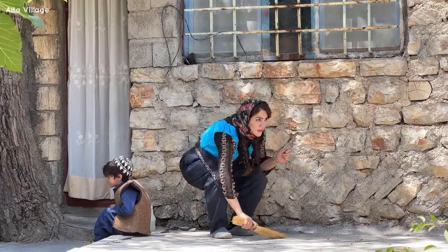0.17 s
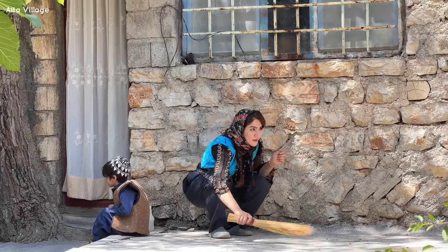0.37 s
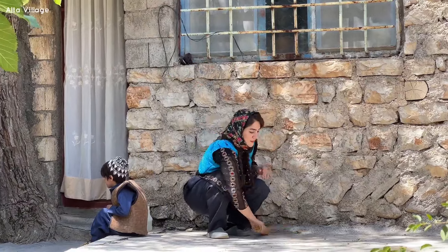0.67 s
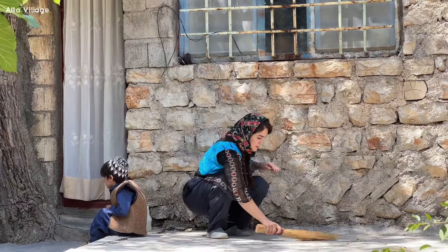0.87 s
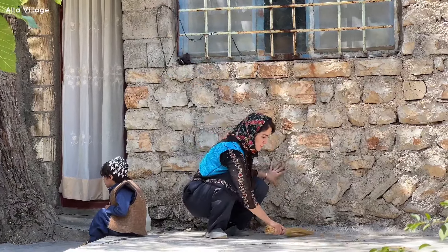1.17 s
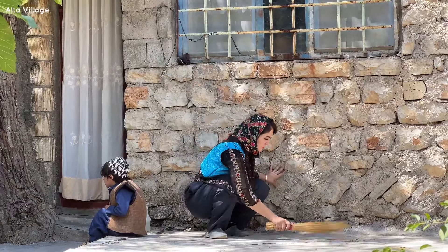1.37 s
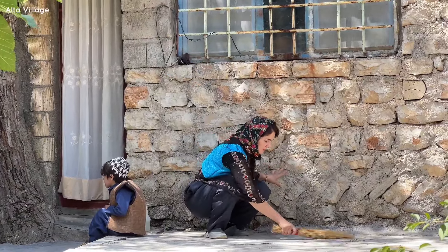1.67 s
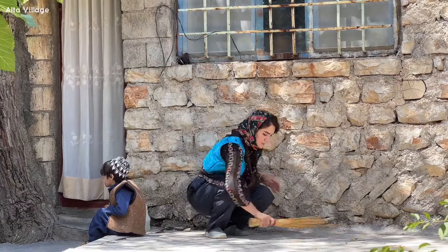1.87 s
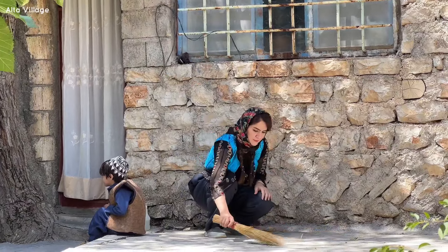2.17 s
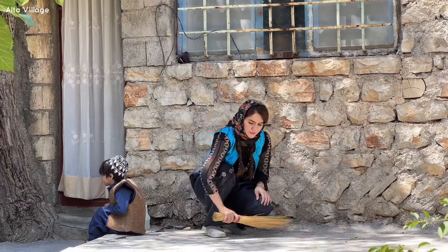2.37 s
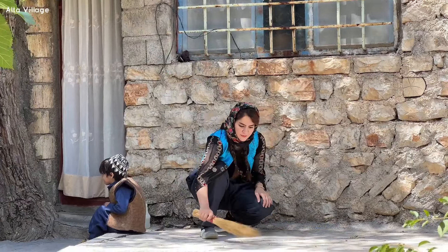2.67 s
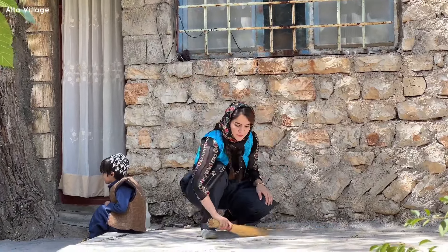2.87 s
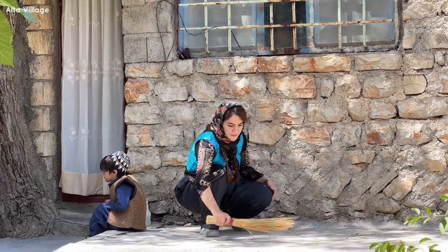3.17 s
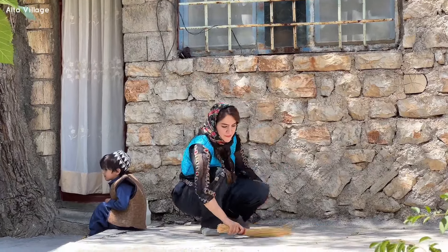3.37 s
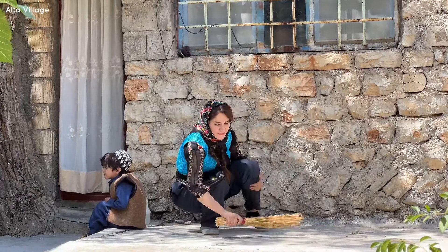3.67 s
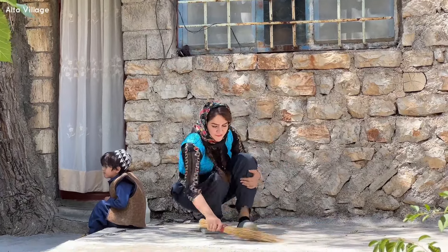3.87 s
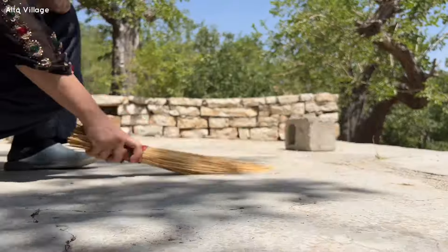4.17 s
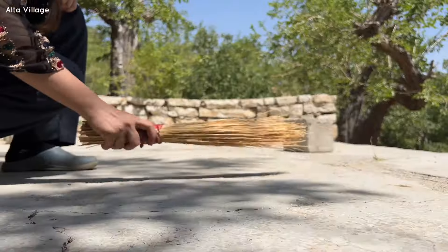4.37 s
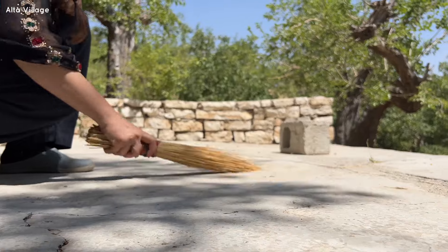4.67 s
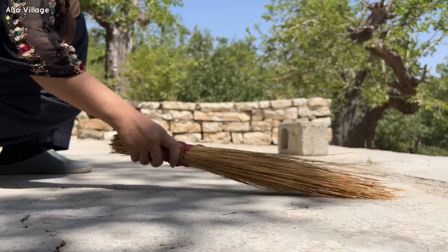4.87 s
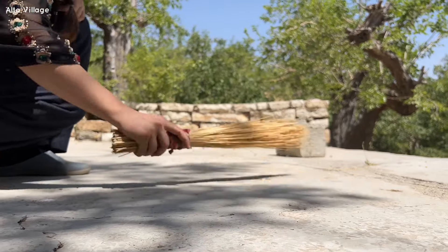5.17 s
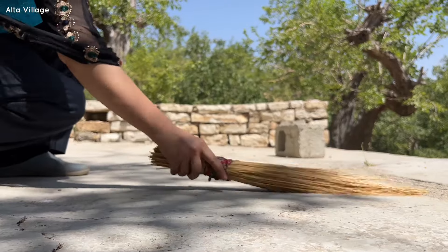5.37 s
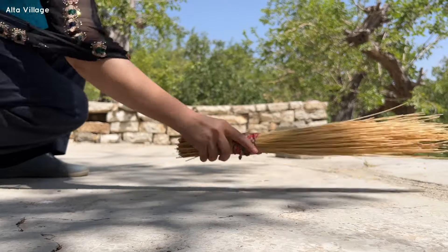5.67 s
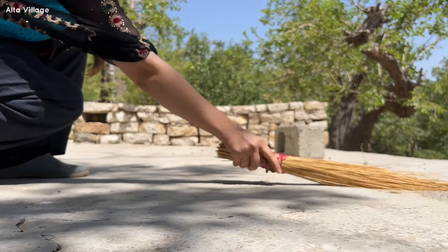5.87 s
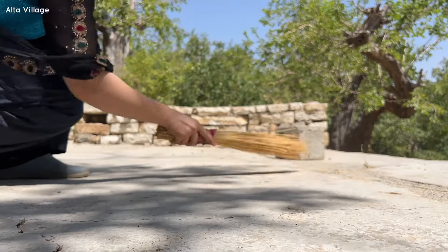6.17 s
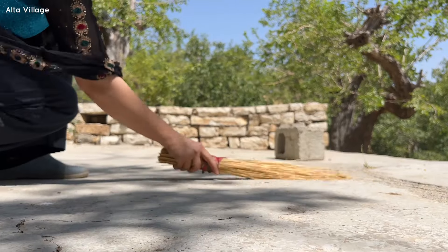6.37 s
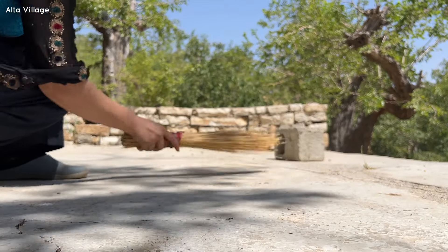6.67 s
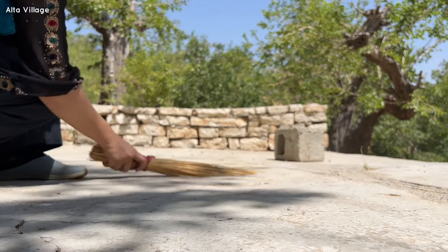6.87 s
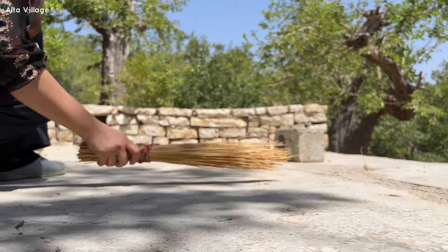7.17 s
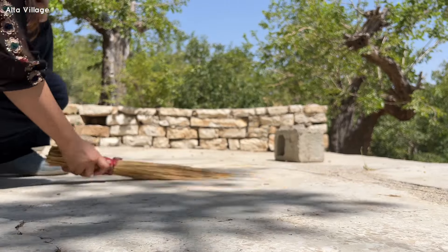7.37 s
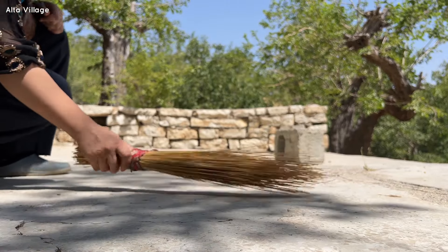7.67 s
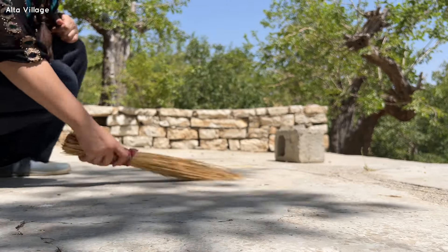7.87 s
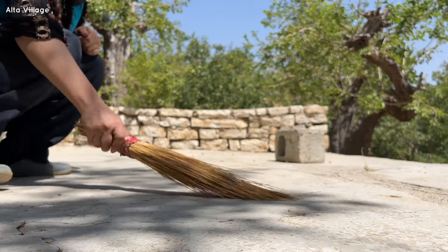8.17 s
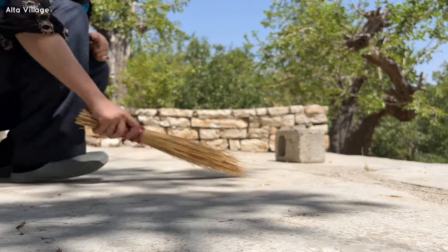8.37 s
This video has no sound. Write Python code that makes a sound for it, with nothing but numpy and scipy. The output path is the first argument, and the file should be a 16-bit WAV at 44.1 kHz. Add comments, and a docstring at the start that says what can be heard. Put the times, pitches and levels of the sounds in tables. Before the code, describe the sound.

A short straw broom sweeps concrete in brisk strokes, softly from a few metres over a distant engine thud, then suddenly loud and close.

```python
"""A concrete yard: a short straw broom sweeps in brisk strokes, first from a few metres, then from close by.
Far spot: a distant one-cylinder engine thuds, a rooster crows faintly and gusts buffet the microphone.
After a near-silent instant the broom is close and loud, with cloth rustling over quiet outdoor air.
The broom is dense random clicks coloured by the straws, air and cloth are shaped noise;
engine, bumps and a knock are dying low tones, the grit is short bursts of ringing noise."""
import sys
import numpy as np
from scipy import signal
from scipy.fft import rfft, irfft
from scipy.io import wavfile
from scipy.ndimage import uniform_filter1d

SR = 44100
rng = np.random.default_rng(int(sys.argv[2]) if len(sys.argv) > 2 else 0)


def generate_wav(signal):
    """Clip the signal to [-1, 1] and save it as 16-bit WAV at the path in sys.argv[1]."""
    frames = np.transpose(np.atleast_2d(signal))
    scaled = np.clip(frames, -1, 1) * 32767
    pcm = np.round(scaled).astype(np.int16)
    wavfile.write(sys.argv[1], SR, pcm)


N = 374850
TIME, BINS = np.arange(N) / SR, np.fft.rfftfreq(N, 1 / SR)  # s, Hz
FAR_END, NEAR_START = 4.083, 4.128  # s
SILENT_DB = -110.0  # floor under the broom levels
BROOM_TRIM_DB = -1.5  # applied to the strokes at both spots


def amp(db):
    """Decibels to amplitude."""
    return 10 ** (np.asarray(db) / 20)


def evened(x):
    """Scale a signal to unit RMS."""
    return x / np.sqrt(np.mean(x ** 2) + 1e-20)


def read(points, hz, axis=1):
    """One column of a table over log frequency."""
    table = np.array(points, float)
    return np.interp(np.log(hz + 1), np.log(table[:, 0] + 1), table[:, axis])


def add(mix, s, sound):
    """Lay a sound into the mix at time s, cut off at the end."""
    part = mix[..., round(s * SR):][..., :sound.shape[-1]]
    part += sound[..., :part.shape[-1]]


def drift(hz):
    """Random wandering of unit RMS, mostly slower than hz."""
    return evened(irfft(rfft(rng.standard_normal(N)) / (1 + (BINS / hz) ** 4), N))


def patchwork(shape, bins, frames):
    """Random dB map of unit RMS, smoothed over frequency bins and time frames."""
    smooth = uniform_filter1d(rng.standard_normal(shape), size=bins, axis=0)
    return evened(uniform_filter1d(smooth, size=frames, axis=1))


def noise(spectrum, likeness, patchy_db):
    """Two-channel noise of a given colour, with patches that swell and fade."""
    shared, side = rng.standard_normal((2, N))
    c = np.clip(likeness, 0, 1)
    pair = np.sqrt((1 + c) / 2) * shared + np.sqrt((1 - c) / 2) * np.array([side, -side])
    hz, _, z = signal.stft(pair, SR, nperseg=2048, noverlap=1536)
    patches_db = patchy_db * patchwork(z.shape[1:], bins=12, frames=8)
    z = z * amp(read(spectrum, hz)[:, None] + patches_db)
    out = signal.istft(z, nperseg=2048, noverlap=1536)[1][:, :N]
    return out / out.mean(0).std()


def swells(rows):
    """Summed power of smooth bell-shaped swells."""
    return sum(amp(db) ** 2 * np.exp(-(2 * (TIME - s) / length) ** 2) for s, length, db in rows)


# Outdoor air at the far spot: freq_hz, relative_level_db (per Hz)
FAR_AIR = [(60, -18.5), (170, -8), (350, -14.5), (700, -25.5), (1500, -29), (2500, -31.5), (4200, -43.5),
           (11000, -40), (15500, -75)]


def far_air():
    """Low-heavy noise of the open air at the far spot."""
    return amp(-68) * noise(FAR_AIR, likeness=0.53, patchy_db=3.5)


# Low resonances of the exhaust: freq_hz, damping_hz, relative_level_db
EXHAUST = [(63.3, 14, -3), (117, 15.5, 4)]
ENGINE_HZ, ENGINE_START, ENGINE_DB = 11.15, 0.01196, -57.5  # firings a second, first firing s, RMS level dB


def engine(uneven_db=2.5, jitter_s=0.001):
    """Each firing rings the exhaust; distance leaves only the low thud."""
    out, t = np.zeros(N), np.arange(8000) / SR
    thud = np.zeros(len(t))
    for hz, damping, db in EXHAUST:
        envelope = (damping * t) ** 2 * np.exp(-np.pi * damping * 1.6 * t)
        thud += amp(db) * envelope * np.sin(2 * np.pi * hz * t)
    times = np.arange(ENGINE_START, FAR_END, 1 / ENGINE_HZ)
    for s, (late, strength) in zip(times, rng.standard_normal((len(times), 2))):
        add(out, max(s + jitter_s * late, 0), amp(uneven_db * strength) * thud)
    return amp(ENGINE_DB) * out / out[TIME < FAR_END].std()


# Low rumble of the wind: freq_hz, relative_level_db (per Hz)
WIND = [(10, -42), (25, -22), (45, 0.5), (65, 1), (90, -6.5), (150, -35), (400, -60)]
# Stronger gusts: peak_s, length_s, level_db
GUSTS = [(.57, .14, -52), (1.69, .07, -50.5), (2.79, .12, -49), (3.35, 0.084, -48.5), (3.54, 0.043, -44.5),
         (3.91, .25, -42.5), (4.36, .12, -60), (4.65, 0.26, -63), (7.5, .6, -76), (8.35, .3, -74)]
FAR_BREEZE_DB, NEAR_BREEZE_DB, BREEZE_HZ = -57, -85, 4  # mid levels, and how fast the breeze swells


def wind(lumpy_db=3.0):
    """A lumpy breeze and a few gusts buffet the microphone."""
    base_db = np.where(TIME < NEAR_START, FAR_BREEZE_DB, NEAR_BREEZE_DB)
    breeze = amp(base_db + lumpy_db * drift(BREEZE_HZ))
    return noise(WIND, likeness=0.9, patchy_db=0.5) * np.sqrt(breeze ** 2 + swells(GUSTS))


def slips(per_s, spread_db):
    """Straw tips catch on the concrete and let go: dense clicks of uneven size."""
    size = amp(spread_db * np.minimum(rng.exponential(1, (2, N)), 5))
    happens = rng.random((2, N)) < per_s / SR
    return evened(size * rng.standard_normal((2, N)) * happens)


def spread_pair(x, spread):
    """Two unrelated sounds become a partly alike stereo pair, widened by a phase shift per frequency."""
    a, b = rfft(x)
    c, lead = np.clip(read(spread, BINS), 0, 1), read(spread, BINS, axis=2)
    right = (c * a + np.sqrt(1 - c ** 2) * b) * np.exp(-1j * lead)
    return irfft(np.array([a, right]), N)


def sweeping(strokes, touches, land_s, lift_power, yard_db, yard_t60):
    """Level in dB: straws land, speed up, slow as they lift; soft touches between; the yard dies away."""
    def landing(s, db):
        """Power of a short bump that peaks land_s after touch-down."""
        u = np.maximum(TIME - s, 0) / land_s
        return amp(db) ** 2 * (u * np.exp(1 - u)) ** 6
    push_power = 2.65  # the scrape grows as this power of the broom's speed during the push
    power = sum(landing(s, db) for s, db in touches)
    for s, push, lift, land_db, sweep_db, _ in strokes:
        speed = np.sin(np.pi / 2 * np.interp(TIME, [s, s + push, s + push + lift], [0, 1, 0]))
        scrape = amp(sweep_db) * speed ** np.where(TIME < s + push, push_power, lift_power)
        power = power + landing(s, land_db) + scrape ** 2
    keep = np.exp(-2 * np.log(1000) / (yard_t60 * SR))
    yard = amp(yard_db) ** 2 * signal.lfilter([1 - keep], [1, -keep], power)
    return 10 * np.log10(power + yard + amp(SILENT_DB) ** 2)


def angle(strokes):
    """Brightness in dB per octave: the wrist turns from one stroke's angle to the next."""
    s, push, *_, tilt = np.transpose(strokes)
    return np.interp(TIME, s + push, tilt)


def broom(level_db, tilt, clicks, straw, bundle, balance, brighten, ring_db, chatter_db):
    """Slips ring in the straws; a faster stroke is louder and brighter, and the bundle chatters."""
    hz, t, z = signal.stft(clicks, SR, nperseg=512, noverlap=384)
    slack_db = np.clip(np.interp(t, TIME, level_db) - level_db.max(), -35, 0)
    slope_db = brighten * slack_db + np.interp(t, TIME, tilt)
    octaves = np.log2((hz[:, None] + 600) / 4000)
    body_db = read(straw, hz)
    for centre, width, db in bundle:
        body_db = body_db + db * np.exp(-((hz - centre) / width) ** 2)
    # other straws touch from moment to moment, so narrow resonances come and go
    rings = patchwork(z.shape[1:], bins=2, frames=30)
    colour = amp(body_db[:, None] + slope_db * octaves + ring_db * rings)
    sides = amp(np.array([[0.5], [-0.5]]) * read(balance, hz))
    z = z * colour * sides[:, :, None]
    # level out the main band, so that the stroke alone sets the loudness
    main = (hz > 1500) & (hz < 9000)
    band_power = (abs(z.mean(0)[main]) ** 2).sum(0)
    z /= np.sqrt(uniform_filter1d(band_power, size=15) * 4 / 3 + 1e-12)
    scrape = signal.istft(z, nperseg=512, noverlap=384)[1][:, :N]
    return scrape * amp(level_db + chatter_db * drift(70))


# Far strokes, levels before the broom trim:
# touch_s, push_s, lift_s, landing_db, sweep_db, brightness_db_per_octave (from the angle of the straws)
FAR_STROKES = [(.106, 0.094, 0.16, -58.5, -44, -0.2), (.651, .15, 0.16, -54.6, -43.5, 0),
               (1.147, 0.11, 0.11, -63.5, -43.5, -0.2), (1.557, 0.096, 0.12, -63.5, -44, 0.4),
               (1.978, 0.13, 0.1, -56.9, -43.5, -0.2), (2.445, .106, 0.13, -56, -43.5, -0.1),
               (2.894, .1, .12, -56, -43, 0.1), (3.354, 0.086, .108, -54.5, -44.5, -0.7),
               (3.766, 0.071, 0.074, -52, -43, -0.5)]
# Light touches of the broom between the far strokes: start_s, level_db (before the broom trim)
FAR_SCUFFS = [(2.378, -66.5), (2.752, -60), (3.183, -57)]
# Straw on concrete from afar: freq_hz, relative_level_db (per Hz)
FAR_STRAW = [(300, -18), (550, -21.5), (800, -9), (1100, -8.5), (1700, -6.5), (2800, -6.5), (4000, -7.5),
             (5000, -3.5), (7000, -4), (8700, -0.6), (11000, -3), (13300, -2), (15000, -4), (16000, 3)]
# Stereo spread per frequency: freq_hz, channel_likeness_0_to_1, left_lead_rad
FAR_SPREAD = [(500, .7, 0), (1500, .92, 0), (3200, .9, 0), (5000, .98, 0), (8700, .95, 0),
              (10050, .97, -3.14), (12050, .92, -6.28), (13700, .97, -9.42), (15500, .92, -12.57)]


def far_broom():
    """The broom a few metres off, blurred by the yard's short decay; the scuffs share its noise."""
    level_db = sweeping(FAR_STROKES, FAR_SCUFFS, land_s=0.021, lift_power=0.92, yard_db=-4.5, yard_t60=0.23)
    clicks = spread_pair(slips(per_s=25000, spread_db=1.16), FAR_SPREAD)
    centred = [(1000, 0)]
    return amp(BROOM_TRIM_DB) * broom(level_db, angle(FAR_STROKES), clicks, FAR_STRAW, [], centred,
                                      brighten=0.081, ring_db=2.2, chatter_db=0.5)


# Dull low bumps: start_s, envelope_peak_db, pitch_hz, decay_s
BUMPS = [(.528, -42, 60, 0.073), (1.012, -37.5, 65, 0.077), (2.76, -44.5, 147, 0.039),
         (3.975, -36.5, 55.3, 0.089), (4.775, -50, 111, 0.032), (7.178, -46.5, 210, 0.015)]


def bumps():
    """Soft blows: a few low cycles that swell and die."""
    out, t = np.zeros(N), np.arange(12000) / SR
    for s, db, hz, decay in BUMPS:
        u = np.log(1000) * t / decay
        add(out, s, amp(db) * u * np.exp(1 - u) * np.sin(2 * np.pi * hz * t))
    return out


# The crow's glide, before its random wavering: time_s, pitch_hz, level_db
CROW = [(.54, 970, -82), (.64, 987, -83), (.95, 1005, -77), (1.08, 993, -69.5), (1.16, 998, -74),
        (1.24, 950, -82)]
# Partials of the voice: multiple_of_pitch, relative_level_db
CROW_PARTIALS = [(1, -1.5), (2, -3.5), (3, -9)]


def rooster(waver):
    """One thin held note from far away: three partials that waver in pitch and level."""
    s, hz, db = np.transpose(CROW)
    turns = np.cumsum(np.interp(TIME, s, hz) * (1 + waver * drift(54))) / SR
    voice = evened(sum(amp(d) * np.sin(2 * np.pi * k * turns) for k, d in CROW_PARTIALS))
    return voice * amp(np.interp(TIME, s, db, left=-140, right=-140) + 4.7 * drift(25))


# Colour of the cloth: freq_hz, relative_level_db (per Hz)
CLOTH_COLOUR = [(50, -19), (120, 0), (250, 1.5), (480, 0.5), (800, -6.5), (2000, -28), (8000, -47)]
# Rustles as the body shifts: peak_s, length_s, level_db
RUSTLES = [(.6, 0.2, -67), (1.9, 0.17, -69), (3.86, 0.21, -68), (4.06, .05, -58), (4.6, .16, -58.5),
           (4.77, 0.07, -64.5), (5.95, 0.21, -62.5), (7.64, .1, -62.5), (8.4, 0.58, -63)]
CLOTH_DB, CLOTH_SWING_DB = -75, -36  # clothes at rest, and relative to the stroke that the arm makes


def cloth(stroke_db, uneven_db=1.5):
    """Soft low rustle of sleeves and trousers, following the arm and the shifts of the body."""
    rest = amp(CLOTH_DB) ** 2 * (TIME > NEAR_START)
    power = rest + amp(stroke_db + CLOTH_SWING_DB) ** 2 + swells(RUSTLES)
    return noise(CLOTH_COLOUR, likeness=0.53, patchy_db=1.5) * np.sqrt(power) * amp(uneven_db * drift(7.3))


# Grit and single straws flicking: start_s, level_db (before the trim), centre_hz, t60_s, width_octaves
TICKS = [(.951, -38, 6000, .04, .6), (1.028, -38.5, 4300, 0.021, 0.35), (1.162, -51, 2400, .04, 0.44),
         (1.558, -53, 11100, 0.023, 0.39), (2.762, -48, 2000, .03, 0.81), (3.199, -48, 7960, 0.021, 0.39),
         (3.292, -54, 8100, 0.044, 0.74), (3.564, -43.5, 1980, 0.074, 0.71), (4.04, -50, 880, 0.014, 0.35),
         (4.064, -52.5, 1760, 0.048, 0.7), (4.292, -39, 2340, 0.036, 0.56), (5.145, -35, 4430, .03, 0.39),
         (5.62, -58, 9000, 0.025, 1.4), (6.624, -45.5, 5540, .04, 0.49), (7.614, -48, 3520, 0.048, 0.52)]


def grit(tail_db=-24, tail_s=0.19, trim_db=-8):
    """Each tick is a quickly dying ring with a faint tail from the yard."""
    out, t = np.zeros((2, N)), np.arange(8192) / SR
    hz = np.fft.rfftfreq(len(t), 1 / SR)
    for s, db, centre, t60, width in TICKS:
        white = rng.standard_normal(len(t)) + 0.5 * rng.standard_normal((2, len(t)))
        band = np.hypot(1, np.log2((hz + 1) / centre) / width) ** 2
        ring = evened(irfft(rfft(white) / band))
        envelope = amp(-60 * t / t60) + amp(tail_db - 60 * t / tail_s)
        add(out, s, amp(db + trim_db) * ring * envelope)
    return out


# Modes of a hollow knock: pitch_hz, relative_level_db, t60_s
KNOCK_MODES = [(500, 1.5, 0.019), (680, -8, 0.015), (1510, -16.5, .018)]
KNOCK_S, KNOCK_DB = 4.039, -31.5  # start, and the level the modes are set against


def knock():
    """A light blow rings a few short modes together."""
    out, t = np.zeros(N), np.arange(4000) / SR
    ring = np.zeros(len(t))
    for hz, db, t60 in KNOCK_MODES:
        ring += amp(db - 60 * t / t60) * np.sin(2 * np.pi * (hz * t + rng.random()))
    add(out, KNOCK_S, amp(KNOCK_DB) * ring * np.minimum(t / 0.00085, 1))  # 0.85 ms attack
    return out


# Close strokes, levels before the broom trim:
# touch_s, push_s, lift_s, landing_db, sweep_db, brightness_db_per_octave (from the angle of the straws)
NEAR_STROKES = [(4.118, 0.037, 0.12, -41, -27, .5), (4.441, 0.14, 0.13, -41, -27.6, -0.037),
                (4.869, 0.15, 0.099, -40.5, -27, .2), (5.284, 0.15, 0.11, -38, -29.3, -.3),
                (5.741, .12, 0.35, -40, -29.6, -0.6), (6.281, 0.17, 0.14, -42, -30, 0.21),
                (6.753, 0.12, 0.15, -37.5, -30.5, 0.031), (7.206, 0.17, 0.12, -32.5, -28, -0.16),
                (7.686, 0.15, 0.13, -39, -27.5, 0.47), (8.13, 0.18, 0.12, -36.6, -30.1, 0.26)]
# Tips graze the ground between strokes: touch_s, level_db (before the broom trim)
NEAR_GRAZES = [(5.128, -54.5), (7.5, -52.5), (7.984, -49), (8.08, -45), (8.408, -48.5)]


def near_level():
    """Level in dB of the close strokes, with little of the yard."""
    return sweeping(NEAR_STROKES, NEAR_GRAZES, land_s=0.032, lift_power=1.524, yard_db=-15, yard_t60=0.34)


# Stereo spread per frequency: freq_hz, channel_likeness_0_to_1, left_lead_rad
NEAR_SPREAD = [(300, .8, .1), (900, .65, .6), (1600, .55, 2), (2200, .65, .2), (3100, .6, 3.1),
               (3800, .4, 4.7), (4700, .4, 9), (6500, .15, 11), (8700, .35, 12), (10050, .97, 9.42),
               (12050, .92, 6.28), (13700, .97, 3.14), (15500, .92, 0)]


def near_slips():
    """The straw clicks of the close broom, spread wide in stereo."""
    return spread_pair(slips(per_s=24000, spread_db=1.5), NEAR_SPREAD)


# Straw on concrete up close: freq_hz, relative_level_db (per Hz)
NEAR_STRAW = [(80, -33.5), (250, -19), (550, -14.5), (1150, -6.5), (1950, -5.5), (2600, -0.5), (3600, -2),
              (4700, -3), (5900, -0.5), (7900, -2), (9500, -6.5), (11700, 1), (13500, -5), (15500, -5)]
# Peaks and dips of the close broom: centre_hz, width_hz, gain_db
BUNDLE = [(1160, 63, 0.5), (1890, 120, -3), (2470, 150, 1.5), (2850, 210, 2.5), (3060, 140, -0.5),
          (5640, 680, 3.5), (8080, 670, 3)]
# Stereo balance, also used by the drag: freq_hz, left_minus_right_db
NEAR_BALANCE = [(60, 14), (92, 4), (140, 5), (210, -5), (330, 1), (500, -3), (770, 3.5), (1170, -2),
                (1790, 3), (2740, -3.5), (4190, 2), (6410, 1), (9810, -0.5), (15000, 0.5)]


def near_broom(level_db, clicks):
    """The loud close broom, where the bundle's own resonances stand out."""
    return amp(BROOM_TRIM_DB) * broom(level_db, angle(NEAR_STROKES), clicks, NEAR_STRAW, BUNDLE, NEAR_BALANCE,
                                      brighten=0.09, ring_db=2.5, chatter_db=0.5)


# Outdoor air at the near spot: freq_hz, relative_level_db (per Hz)
NEAR_AIR = [(30, -22), (120, -6), (220, -10.5), (480, -14), (1170, -11.5), (2500, -12), (5600, -13.5),
            (9000, -22.5), (15500, -52)]


def near_air():
    """Quiet, wide noise of the open air at the near spot."""
    return amp(-64.5) * noise(NEAR_AIR, likeness=0.071, patchy_db=3.0)


# Straw tips dragging lightly: freq_hz, relative_level_db (per Hz)
DRAG_STRAW = [(150, -20), (700, -8), (1150, -1.5), (1750, -11.5), (2600, -5.5), (3600, 5), (4900, -4),
              (6000, -4.5), (8000, -2), (10000, -26), (12000, -24), (15500, -29)]
DRAG_S, DRAG_DB = 7.022, -44.5
DRAG_ATTACK_S, DRAG_HOLD_S, DRAG_RELEASE_DB_PER_S = 0.029, 0.088, 380


def drag(clicks):
    """The tips drag lightly on one back swing: attack, hold, release."""
    t = TIME - DRAG_S
    release_db = DRAG_RELEASE_DB_PER_S * np.maximum(t - DRAG_ATTACK_S - DRAG_HOLD_S, 0)
    attack = np.clip(t / DRAG_ATTACK_S, 0, 1) ** 2
    level_db = 20 * np.log10(attack * amp(DRAG_DB - release_db) + amp(SILENT_DB))
    return broom(level_db, np.zeros(N), clicks, DRAG_STRAW, [], NEAR_BALANCE,
                 brighten=0.04, ring_db=2.0, chatter_db=-0.2)


def scene():
    """The far spot, a near-silent instant, then the near spot."""
    far = far_air() + engine() + far_broom() + rooster(waver=0.0098)
    near_db, clicks = near_level(), near_slips()
    near = near_broom(near_db, clicks) + near_air() + drag(clicks)
    far_on, near_on = uniform_filter1d(1.0 * np.array([TIME < FAR_END, TIME > NEAR_START]), size=200)
    both_spots = (wind() + cloth(near_db)) * (far_on + near_on)
    ungated = grit() + bumps() + knock()
    return far * far_on + near * near_on + both_spots + ungated


def record(dry):
    """The recorder's band limit: a steep low-pass at 15780 Hz."""
    lowpass = signal.firwin(801, 15780, window=("kaiser", 9), fs=SR)
    return signal.oaconvolve(dry, lowpass[None], "same")


dry = scene()
out = record(dry)
generate_wav(out)
```